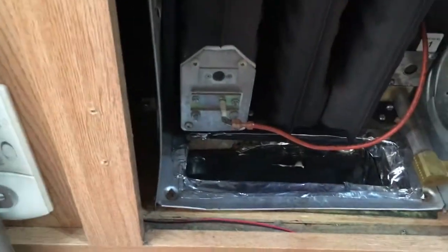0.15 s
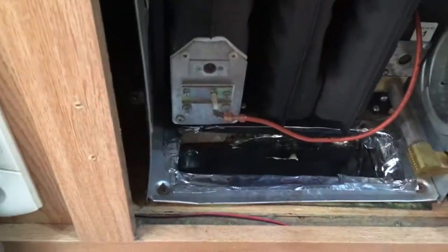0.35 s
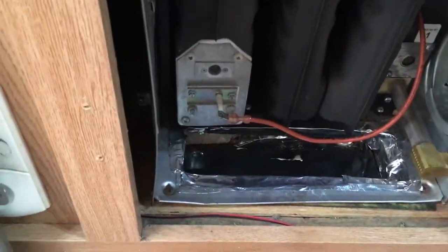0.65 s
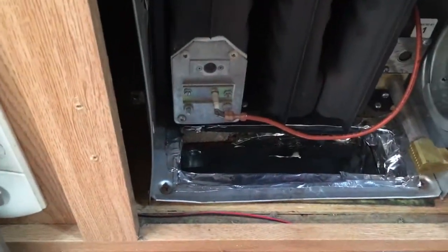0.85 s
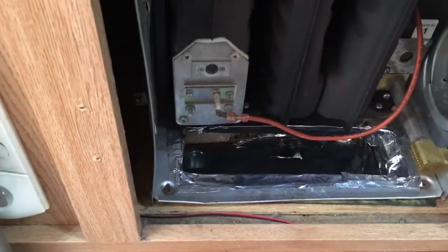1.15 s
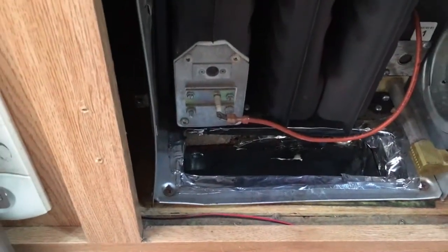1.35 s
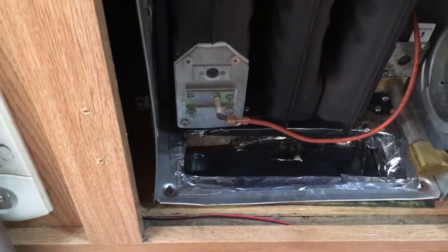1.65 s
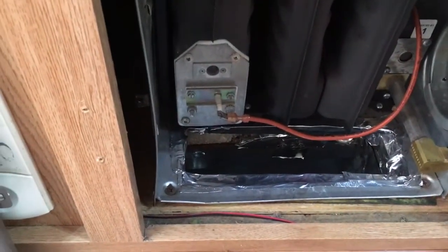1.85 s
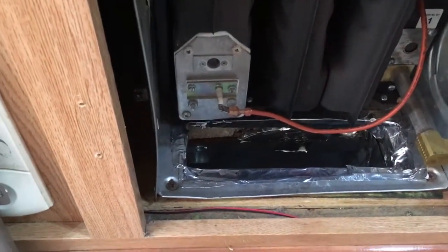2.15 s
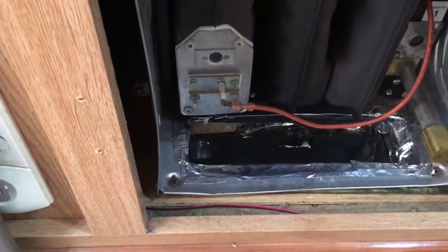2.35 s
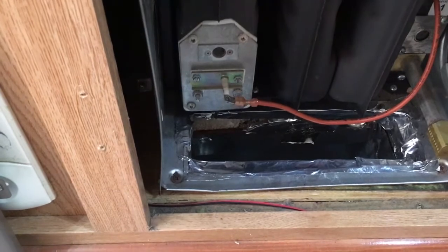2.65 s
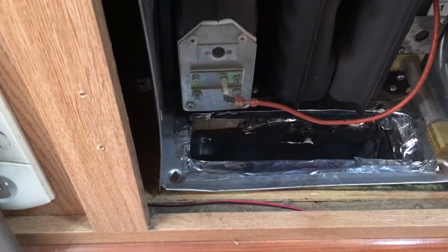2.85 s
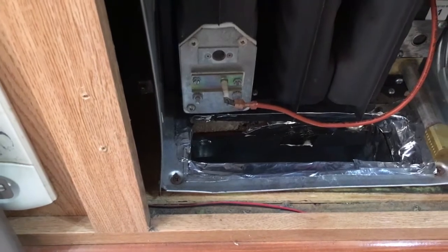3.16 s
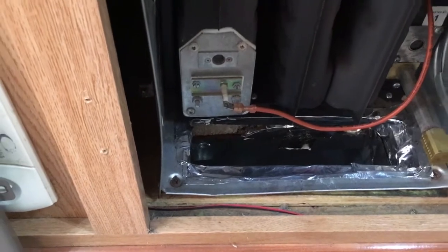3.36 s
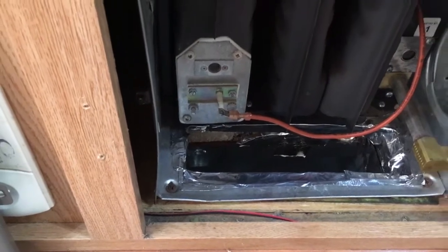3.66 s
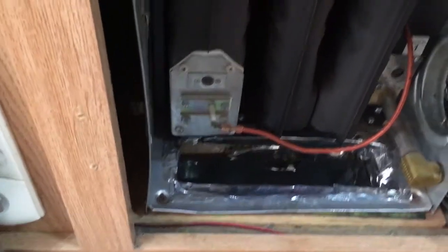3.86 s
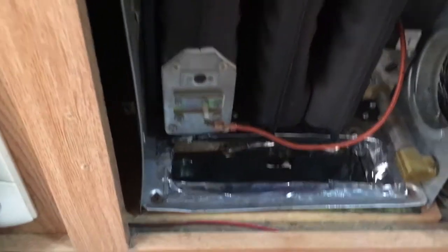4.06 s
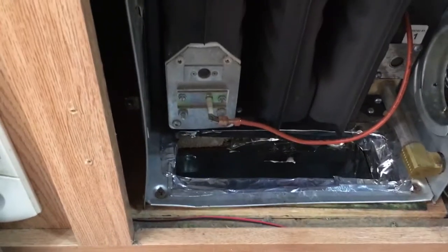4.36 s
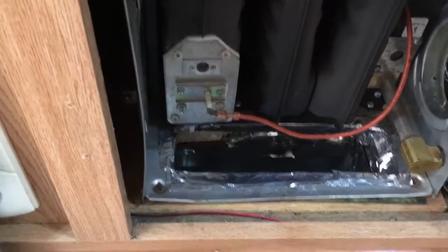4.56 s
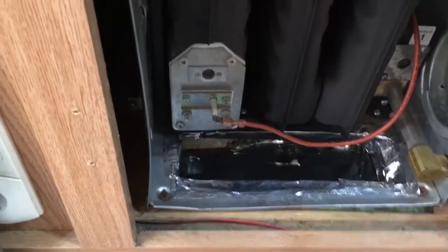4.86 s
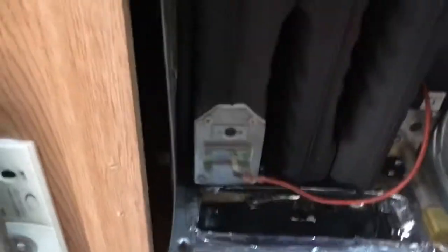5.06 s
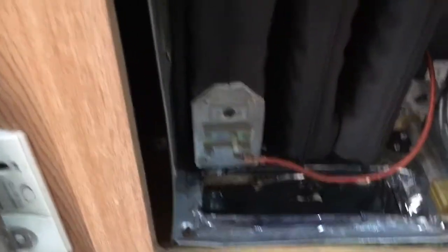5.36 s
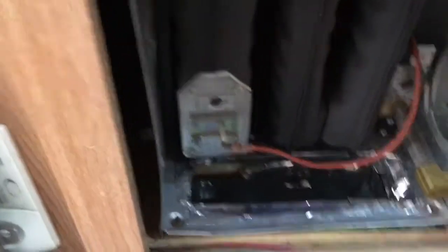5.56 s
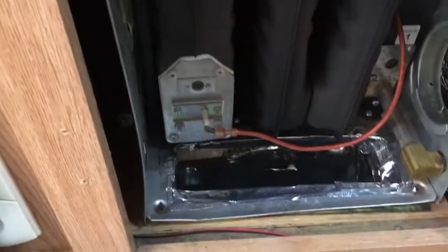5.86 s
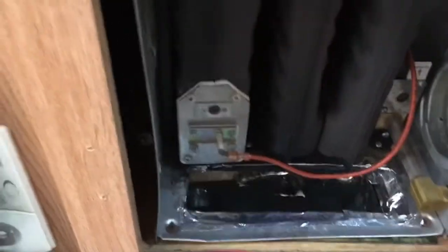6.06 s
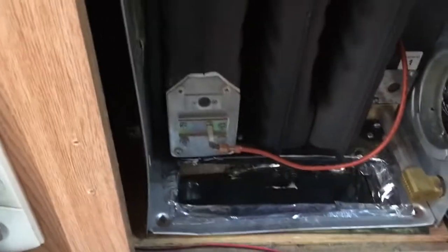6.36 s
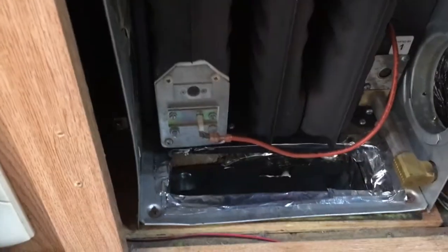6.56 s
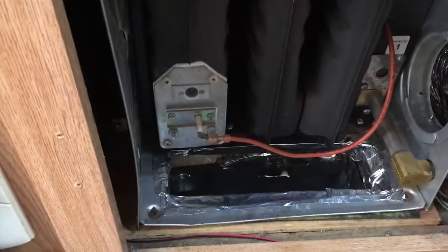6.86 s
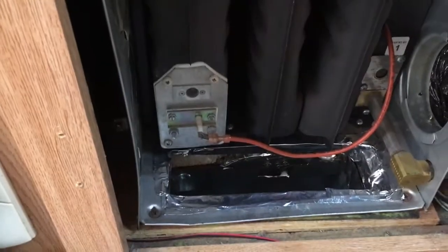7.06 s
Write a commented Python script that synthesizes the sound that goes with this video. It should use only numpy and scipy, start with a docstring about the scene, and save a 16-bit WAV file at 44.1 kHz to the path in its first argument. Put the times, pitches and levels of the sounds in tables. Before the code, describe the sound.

Close mono sound of a heater fan inside a small wooden cabinet in a camper. Broad, mostly midrange rushing air with soft hiss blends with a many-toned steady hum. Low gusty rumble comes and goes at the microphone. A very short dry tick repeats evenly, its strength varying, with tiny bright clicks between. The second half adds a faint breathy duct whistle in gentle swells; the blower never stops.

```python
"""A camper's furnace blower runs steadily behind an open wooden panel: air rushes through its ringing
sheet-metal casing, the fan wheel hums on multiples of its turning rate, and a draught rumbles on the microphone.
From the start a dry tick recurs every 1.3 s, with faint high clicks between; now and then the rush's low noise
thickens slightly for a moment. Near 2.8 s the hum's balance gently shifts, and a faint, airy duct whistle,
shaped from noise, grows and comes in swells until the end."""
import sys
import numpy as np
from scipy import signal
from scipy.fft import rfft, irfft, next_fast_len
from scipy.io import wavfile
from scipy.ndimage import uniform_filter1d

SR = 44100
rng = np.random.default_rng(int(sys.argv[2]) if len(sys.argv) > 2 else 0)


def waveform_to_disk(signal):
    """Save audio, clipped to [-1, 1], as 16-bit WAV at the path in sys.argv[1]."""
    frames = np.transpose(np.atleast_2d(signal))
    scaled = np.clip(frames, -1, 1) * 32767
    samples = np.round(scaled).astype(np.int16)
    wavfile.write(sys.argv[1], SR, samples)


N = 317726


def from_db(db):
    """Turn decibels into a gain."""
    return 10 ** (np.asarray(db) / 20)


def in_time(rows):
    """Read a (time, value) table at every sample, with straight lines between its rows."""
    return np.interp(np.arange(N) / SR, *np.transpose(rows))


def at_hz(points, hz):
    """Read a (frequency, level) table on a logarithmic frequency axis."""
    knots, db = np.transpose(points)
    return np.interp(np.log(hz + 1e-9), np.log(knots), db)


def drift(rate_hz):
    """Slow random wandering of spread 1, mostly below rate_hz."""
    step = 40  # computed at every 40th sample, then joined by straight lines
    pole = np.exp(-2 * np.pi * rate_hz * step / SR)
    noise = rng.standard_normal(N // step + 2002)
    slow = signal.lfilter([1], [1, -2 * pole, pole * pole], noise)[2000:]  # skip the filter's start
    return np.interp(np.arange(N) / step, np.arange(len(slow)), slow / slow.std())


def turbulence(spectrum, resonances=()):
    """Steady noise shaped to a spectrum in dB per Hz, raised or lowered around each resonance."""
    size = next_fast_len(N)
    hz = np.fft.rfftfreq(size, 1 / SR)
    db = at_hz(spectrum, hz)
    for centre_hz, width_hz, lift_db in resonances:
        db = db + lift_db / (1 + (2 * (hz - centre_hz) / width_hz) ** 2)
    white = rfft(rng.standard_normal(size))
    return irfft(white * from_db(db), size)[:N] * np.sqrt(SR / 2)


def evened(x, span_s):
    """Hold noise near rms 1 over stretches of about span_s, so a level table can then set its strength."""
    span = int(span_s * SR)
    power = uniform_filter1d(uniform_filter1d(x ** 2, span), span // 2 + 1)
    return x / np.sqrt(power)


def impulses(rows):
    """Place one single-sample impulse for each (time, level) row."""
    out = np.zeros(N)
    for time_s, db in rows:
        out[round(time_s * SR)] = from_db(db)
    return out


def cabinet(x, echo_db=-24.0, treble_from_hz=2800, count=10):
    """Short reflections inside the cabinet put comb-like peaks and dips into the treble."""
    treble = signal.sosfilt(signal.butter(2, treble_from_hz, "high", fs=SR, output="sos"), x)
    lags = (rng.uniform(0.003, 0.016, count) * SR).astype(int)  # delays of 3 to 16 ms
    echoes = sum(np.pad(treble, (lag, 0))[:N] for lag in lags)
    return x + from_db(echo_db) * echoes


# Rushing air before casing and overall level: (frequency [Hz], level [dB per Hz])
AIR_SPECTRUM = [(140, -66), (250, -68), (400, -70), (700, -75.5), (1000, -77.0), (1400, -76), (1900, -91),
                (2300, -92.0), (3300, -91), (5000, -94), (9500, -98.5), (11000, -103.6), (13000, -106.2),
                (15500, -119.1)]
# Resonances and hollows of casing and ducts: (frequency [Hz], width [Hz], lift [dB])
CASING_RESONANCES = [(312, 24, 4.5), (421, 136, 5.2), (451.4, 26.7, -7.0), (530, 95, 4.5), (562, 7.1, -4),
                     (597, 21, -4.5), (868, 51, 4.2), (976, 14, -6), (1010, 178, 7.5), (1103, 66, -4),
                     (1297, 95, 5), (1764, 34, 4), (2210, 81, -2.9), (2544, 24, 6.5), (2740, 117, 5),
                     (3170, 20, -0.5), (3530, 170, 1.8), (3870, 97, 5), (4500, 50, 1), (4700, 82, 2.0),
                     (5060, 260, 1.9), (5519, 46, 1.5), (8200, 35, 3), (9855, 200, -0.3)]
# Extra gain of the treble hiss: (time [s], level [dB])
HISS_GAIN = [(0, -0.4), (0.9, 0.2), (3.2, 0.5), (3.9, -0.1), (5.8, -0.24), (7.2, -0.5)]


def airflow(level_db=-0.38, flutter_db=0.45, flutter_hz=24.0, hiss_from_hz=2500):
    """The air stream rings the casing; its strength flutters slightly and its hiss shifts a little."""
    rush = cabinet(turbulence(AIR_SPECTRUM, CASING_RESONANCES))
    hiss = signal.sosfiltfilt(signal.butter(2, hiss_from_hz, "high", fs=SR, output="sos"), rush)
    hiss_change = (from_db(in_time(HISS_GAIN)) - 1) * hiss
    return (rush + hiss_change) * from_db(level_db + flutter_db * drift(flutter_hz))


# Hum partials at mid-shift: (multiple of the turning rate, rms level [dB])
HUM_PARTIALS = [(7,-59), (8,-53), (11,-57.5), (12,-58), (13,-55.5), (14,-53.5), (17,-63.5), (18,-63),
                (19,-58.5), (20,-52.5), (21,-52.6), (22,-58), (23,-63.5), (24,-64.5), (25,-60), (26,-66),
                (27,-65.5), (28,-57.7), (29,-53.3), (30,-49), (32,-59), (33,-58), (36,-68), (37,-59.5),
                (40,-67), (45,-69), (50,-68.5), (53,-73), (59,-76), (62,-72)]
# Partials that grow or fade as the balance shifts: (multiple of the turning rate, whole change [dB])
HUM_BALANCE_SHIFT = [(20, 1.5), (21, -1), (28, -3), (29, -2), (30, -0.5)]
# Speed of the fan wheel before its slight jitter: (time [s], turning rate [turns per s])
WHEEL_SPEED = [(0, 27.59), (2.2, 27.58), (2.9, 27.62), (3.8, 27.655), (5.9, 27.615), (7.2, 27.64)]


def fan_hum(waver_db=0.46, wander_rad=0.13, jitter=0.0003):
    """Every partial follows the wheel's turning and wavers a little; their balance shifts once, gently."""
    shift_at_s, shift_scale_s = 2.8, 0.6
    turns = np.cumsum(in_time(WHEEL_SPEED) * (1 + jitter * drift(3.7))) / SR
    shifted = 0.5 * np.tanh((np.arange(N) / SR - shift_at_s) / shift_scale_s)  # from -0.5 to +0.5
    changes = dict(HUM_BALANCE_SHIFT)
    out = np.zeros(N)
    for multiple, db in HUM_PARTIALS:
        phase = 2 * np.pi * (multiple * turns + rng.random()) + wander_rad * drift(2.3)
        level_db = db + changes.get(multiple, 0) * shifted + waver_db * drift(2.5)
        out += from_db(level_db) * np.sin(phase)
    return np.sqrt(2) * out  # a sine's peak is root 2 times its rms


# Colour of the whistle: (frequency [Hz], relative level [dB])
WHISTLE_COLOUR = [(600, -46), (830, -7), (865, -6), (912, 4.5), (950, -14), (1300, -57)]
# Strength of the whistle, added to its colour: (time [s], level [dB per Hz])
WHISTLE_STRENGTH = [(0, -78), (2.3, -78), (3.2, -70), (3.8, -73), (4.5, -73), (4.95, -69.5), (5.5, -74.5),
                    (6.3, -68.5), (6.8, -71), (7.2, -75)]


def duct_whistle(waver_db=1.0):
    """A narrow band of noise makes an airy, wavering whistle that grows out of the rush in swells."""
    level_db = in_time(WHISTLE_STRENGTH) + waver_db * drift(2.3)
    return turbulence(WHISTLE_COLOUR) * from_db(level_db)


# Colour of the small eddies' rumble: (frequency [Hz], relative level [dB])
SMALL_EDDY_COLOUR = [(25, -25), (45, -5), (55, -1.5), (70, -2.5), (85, -5), (110, -5.5), (150, -14),
                     (200, -20.5), (400, -46), (2000, -100)]
# Surges and lulls of the small eddies, before a fixed trim: (time [s], level [dB])
SMALL_EDDY_LEVEL = [(0.0, -43), (0.06, -34), (0.24, -49), (0.33, -42), (0.6, -45), (0.66, -37.5),
                    (0.87, -42.5), (1.05, -39), (1.26, -41.5), (1.38, -36.0), (1.53, -47), (1.65, -35.0),
                    (1.74, -43.5), (1.89, -37.0), (1.98, -47), (2.07, -36.5), (2.13, -53), (2.22, -38.5),
                    (2.76, -43), (2.94, -37.5), (3.0, -44.0), (3.18, -39.5), (3.24, -48), (3.54, -39.0),
                    (3.78, -43), (3.84, -38.5), (3.99, -47), (4.08, -35), (4.44, -53.5), (4.65, -39.0),
                    (5.04, -42.0), (5.28, -37.5), (5.4, -44), (5.55, -39.5), (5.7, -45), (5.88, -35),
                    (5.97, -44.5), (6.12, -38), (6.18, -49), (6.54, -39.5), (6.69, -52), (6.75, -38.5),
                    (7.02, -44), (7.2, -39.5)]
# Colour of the large eddies' deep rumble: (frequency [Hz], relative level [dB])
LARGE_EDDY_COLOUR = [(10, -32), (17, -5), (22, 0), (30, -2.5), (36, -5.5), (46, -9.5), (54, -18), (75, -29),
                     (200, -63), (2000, -140)]
# Surges and lulls of the large eddies, before a fixed trim: (time [s], level [dB])
LARGE_EDDY_LEVEL = [(0.0, -23), (0.12, -23.5), (0.33, -43), (0.48, -29.5), (0.78, -34.5), (1.02, -26.5),
                    (1.23, -41), (1.35, -30.5), (1.74, -31.0), (2.07, -37), (2.55, -29), (2.88, -31),
                    (3.03, -29), (3.12, -45), (3.57, -30), (3.81, -33.5), (4.14, -27), (4.47, -31.5),
                    (4.65, -30.5), (4.77, -38.5), (5.13, -29), (5.46, -37), (5.61, -29), (5.76, -47),
                    (5.85, -30), (5.94, -26), (6.0, -40), (6.78, -30), (7.08, -37.0), (7.2, -30)]
# Colour of the slow pressure sway at the bottom of hearing: (frequency [Hz], relative level [dB])
SWAY_COLOUR = [(1, -38.5), (4, -27), (8, -30), (11, -32), (15, -39.5), (19, -45.5), (24, -69), (40, -88),
               (200, -140)]
# Strength of the sway: (time [s], level [dB])
SWAY_STRENGTH = [(0.0, -18), (0.66, -26), (1.68, -17.0), (2.46, -14), (2.64, -23.5), (2.91, -15),
                 (3.75, -21.5), (4.2, -27), (4.44, -17.5), (5.73, -22.0), (6.0, -14), (6.27, -23),
                 (6.66, -14.5), (7.2, -23.0)]


def draught(small_trim_db=1.0, large_trim_db=0.3):
    """Eddies of three sizes buffet the microphone: the larger, the deeper and the slower they come and go."""
    small = evened(turbulence(SMALL_EDDY_COLOUR), 0.13) * from_db(small_trim_db + in_time(SMALL_EDDY_LEVEL))
    large = evened(turbulence(LARGE_EDDY_COLOUR), 0.2) * from_db(large_trim_db + in_time(LARGE_EDDY_LEVEL))
    sway = evened(turbulence(SWAY_COLOUR), 0.42) * from_db(in_time(SWAY_STRENGTH))
    return small + large + sway


# Strength of each tick in turn, before rounding and overall level: (level [dB])
TICK_STRENGTH = [-0.8, -8, -8.5, -19.5, -15, -9]


def ticks(level_db=-1.14, top_hz=7500, tail=0.11, tail_s=0.00023):
    """Evenly spaced dry ticks: the signal jumps for about a tenth of a millisecond, with a short dull tail."""
    first_s, every_s = 0.0626, 1.32493
    jumps = impulses([(first_s + k * every_s, db) for k, db in enumerate(TICK_STRENGTH)])
    tails = signal.lfilter([tail], [1, -np.exp(-1 / (tail_s * SR))], jumps)
    rounding = signal.bessel(4, top_hz, norm="mag", fs=SR, output="sos")
    return from_db(level_db) * signal.sosfilt(rounding, jumps + tails)


# Faint high clicks, before noise, filter and overall level: (time [s], level [dB])
CLICK_TIMES = [(0.27, -55), (1.001, -53), (1.575, -53), (2.435, -53), (2.651, -53), (3.162, -52),
               (3.205, -57), (3.3235, -47), (3.998, -54), (4.801, -53), (5.19, -52), (6.81, -51),
               (6.98, -49)]


def faint_clicks(level_db=-3.0, t60_s=0.035, low_hz=7500, high_hz=14500):
    """Tiny bright noise bursts that die within a few hundredths of a second."""
    strays_per_s, stray_db = 4.0, -66  # still fainter ones fall at random
    strays = from_db(stray_db) * (rng.random(N) < strays_per_s / SR)
    keep_per_sample = from_db(-60 / (t60_s * SR))  # falls by 60 dB in t60_s
    decay = signal.lfilter([1], [1, -keep_per_sample], impulses(CLICK_TIMES) + strays)
    bright = signal.butter(2, [low_hz, high_hz], "band", fs=SR, output="sos")
    return from_db(level_db) * signal.sosfilt(bright, decay * rng.standard_normal(N))


def bell(crest_s, length_s):
    """A smooth rise to 1 at crest_s and an equal fall."""
    return np.exp(-(2 * (np.arange(N) / SR - crest_s) / length_s) ** 2)


# Moments of thicker low noise, level added to the colour: (crest time [s], level [dB per Hz], length [s])
THICKER_MOMENTS = [(1.25, -62, 0.072), (1.975, -62, 0.07), (5.064, -61, 0.11), (5.992, -60, 0.033),
                   (6.382, -62.5, 0.12)]
# Colour of that low noise: (frequency [Hz], relative level [dB])
LOW_NOISE_COLOUR = [(120, -30), (260, -3.5), (340, 4), (450, -12), (700, -20), (2000, -60)]


def thicker_low_noise():
    """The rush's low noise thickens slightly for a moment: more noise fades in and out under a bell curve."""
    strength = sum(from_db(db) * bell(crest_s, length_s) for crest_s, db, length_s in THICKER_MOMENTS)
    return turbulence(LOW_NOISE_COLOUR) * strength


def scene():
    """The blower from close by, in mono."""
    blower = airflow() + fan_hum() + duct_whistle()
    details = draught() + ticks() + faint_clicks() + thicker_low_noise()
    return (blower + details)[None, :]


def record(dry):
    """A steep low-pass filter cuts the top above 15.7 kHz."""
    return signal.sosfilt(signal.ellip(10, 0.1, 80, 15700, fs=SR, output="sos"), dry)


dry = scene()
out = record(dry)
waveform_to_disk(out)
```